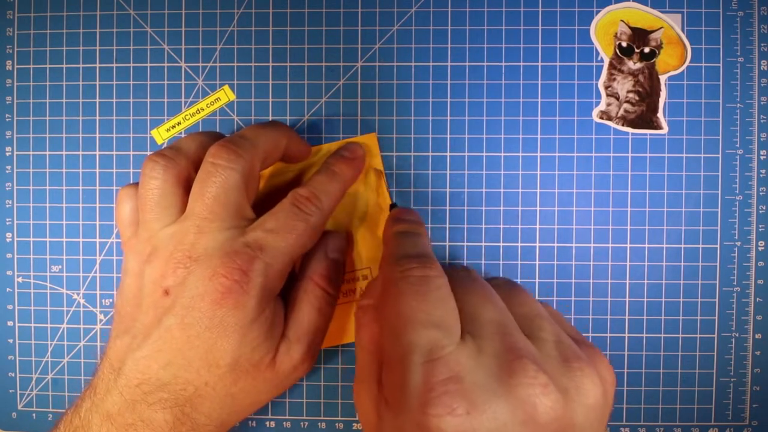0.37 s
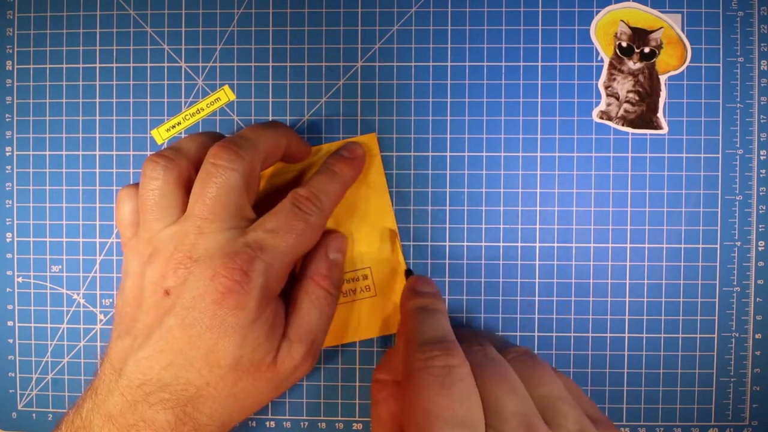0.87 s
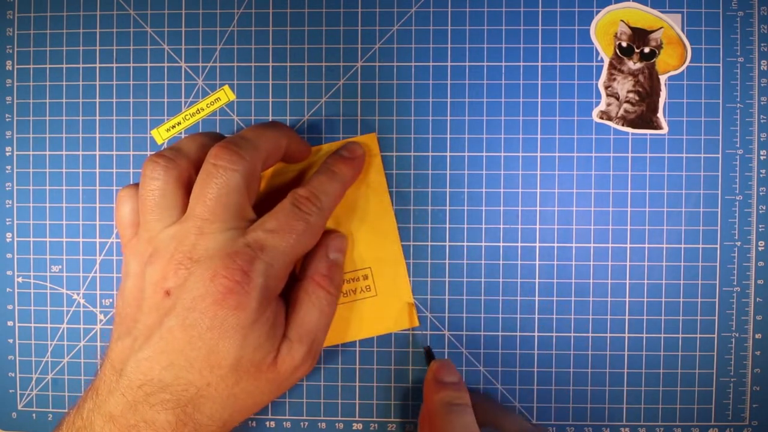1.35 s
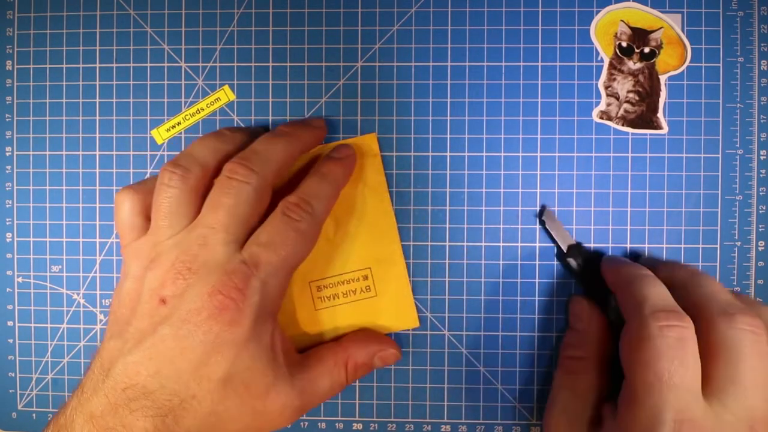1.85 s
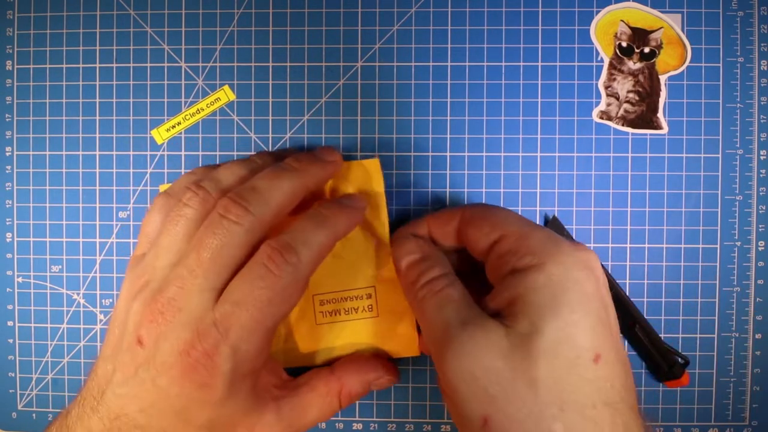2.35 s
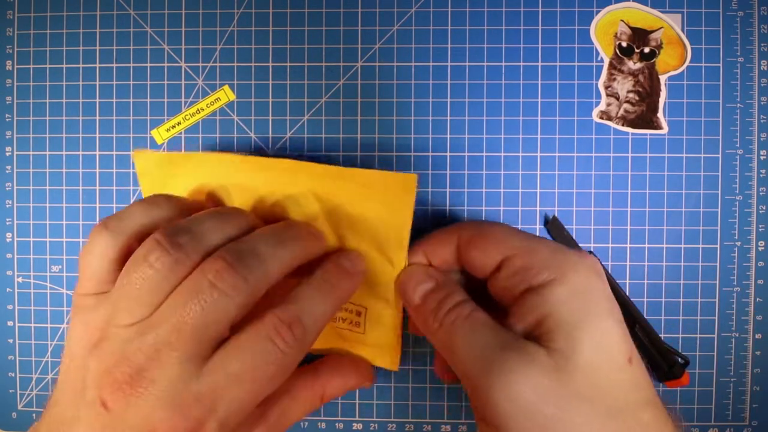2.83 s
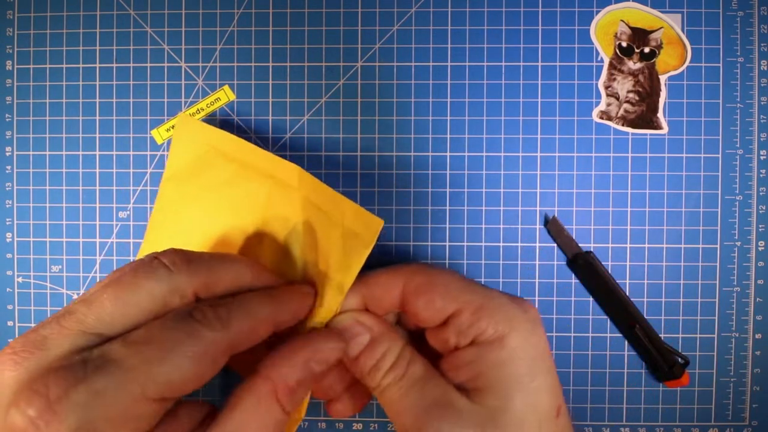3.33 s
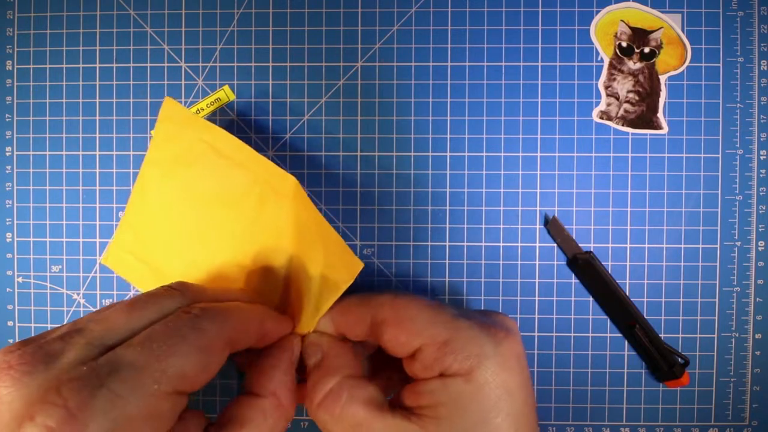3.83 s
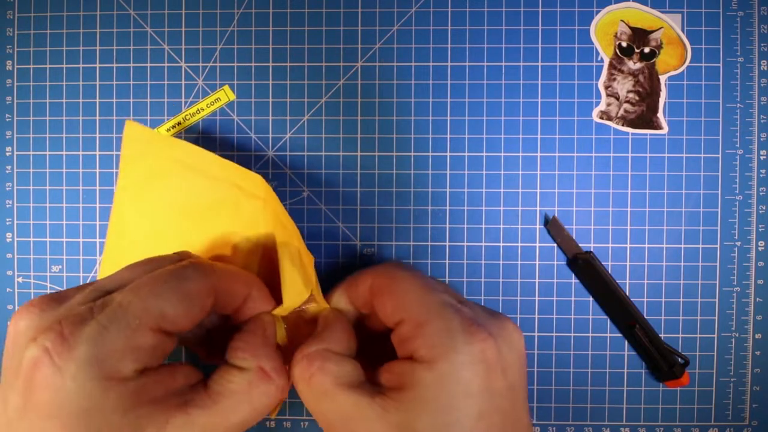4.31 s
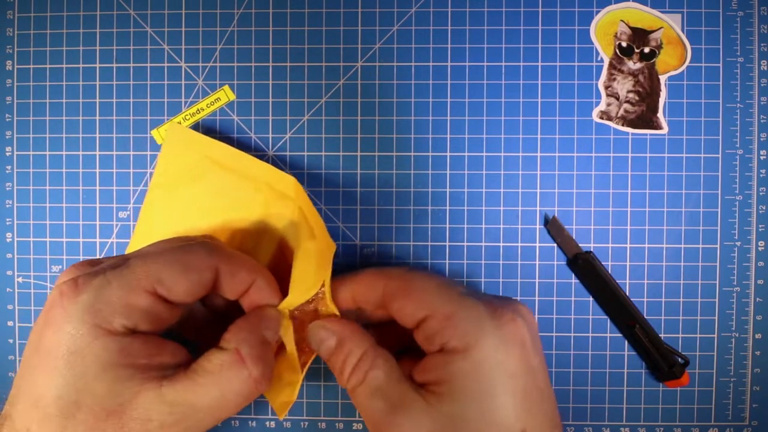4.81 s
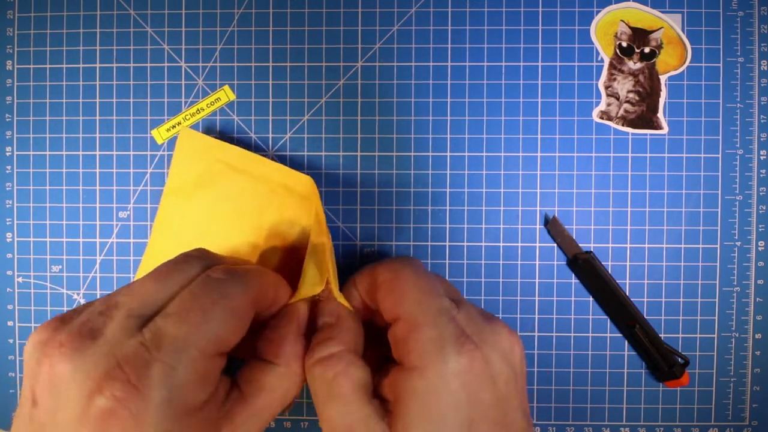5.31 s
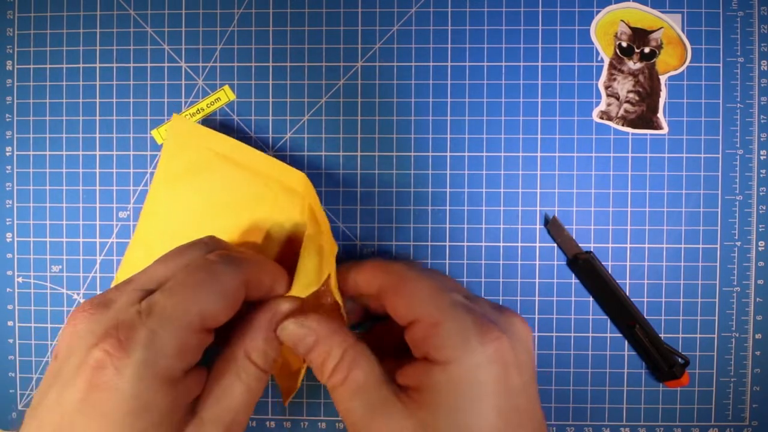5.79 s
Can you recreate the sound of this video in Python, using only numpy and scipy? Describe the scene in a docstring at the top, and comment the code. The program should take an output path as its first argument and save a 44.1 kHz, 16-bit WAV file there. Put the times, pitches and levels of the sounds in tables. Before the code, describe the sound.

Close, nearly mono desk sound in a small room, over faint hiss, low hum and soft table rumble. It starts almost silent; from about 0.2 s a blade scratches through the edge of a paper envelope, a thin, gritty hiss with fine bright ticks, clearest at 0.55 s and until 1.3 s, fading by 1.5 s. Light handling knocks follow, then at 1.91 s the cutter lands with a hard, bright clack, a second knock at 1.97 s and a short loose rattle dying by about 2.2 s. From 2.3 s hands rub and bend the padded paper: mid-toned rustle in uneven surges, crisp snaps at 2.35, 2.7 and 3.14 s, and a dull bump near 3.0 s. It is sparser around 3.5 to 4.1 s, then crackling thickens from 4.2 s with faint soft flexes. The strongest cracks come at 5.5, 5.6, 5.7 and 6.1 s, with the rustle still rising as it ends.

```python
"""A small blade slits the edge of a padded paper envelope on a cutting mat, ticking as it cuts; the knife is
dropped with a rattle, then two hands pull the envelope open, creases snapping over a fine rustle. Sharp cracks
are short noise bursts in bands, the knife a set of struck resonators, the rustle noise driven by clumped tiny
cracks. Padding flexes in soft decaying tones and a small room answers with dense echoes; a close, nearly mono
microphone adds desk rumble, mains hum and faint hiss."""
import sys
import numpy as np
from scipy import signal
from scipy.fft import rfft, irfft
from scipy.io import wavfile

SR = 44100
rng = np.random.default_rng(int(sys.argv[2]) if len(sys.argv) > 2 else 0)


def gain_from_db(level_db):
    """Turn a decibel level (scalar or array-like) into a linear amplitude factor."""
    decades = np.asarray(level_db, float) / 20
    return 10 ** decades


def persist_wave(psi):
    """Save psi, clipped to +-1, as 16-bit WAV."""
    counts = np.round(np.clip(psi, -1, 1) * 32767).astype(np.int16)
    wavfile.write(sys.argv[1], SR, np.atleast_2d(counts).T)


N = 271656

# Sharp cracks: up to 1.3 s ticks of the blade cutting paper, from 1.57 to 2.14 s the knife striking the mat,
# then creases snapping. Each row: start in seconds, relative level in dB, centre in Hz,
# fall below and fall above the centre in dB per octave (sign ignored).
CRACKS = [(.449,-28,4500,14,-2),(.556,-10,4200,20,19),(.602,-23,4000,15,6),(.752,-34,4300,7,6),(.776,-26,4300,9,9),(.822,-23,4200,6,7),(.873,-21,4200,14,7),(.945,-22.5,4000,7,6.5),(1.041,-21.5,4200,11,8),(1.206,-21,2900,18,4.5),(1.224,-21,2500,4,4),(1.257,-17.5,3800,11,11),(1.299,-26.5,4200,3.5,2.5),
          (1.574,-26.5,4000,5.5,5),(1.609,-27.5,2290,6.5,2.5),(1.788,-26.5,1410,8,5),(1.805,-31,2200,1,0.5),(1.85,-25.5,1400,6,5),(1.858,-29,1500,2,10),(1.906,-20,2500,0,6),(1.916,-17,5000,6.5,4),(1.91,2.5,2660,9.5,13),(1.968,-5,2680,6.5,12),(2.064,-12,2500,12,9.5),(2.136,-30,1000,3,6),
          (2.28,-19,680,2,5.5),(2.338,-26,2200,3,14),(2.373,-35,8000,4,1),(2.348,-9.5,3600,10,17),(2.362,-21,800,10,13),(2.395,-22.5,1600,3,10),(2.476,-25,2380,2,6),(2.506,-22,1200,0,3.5),(2.532,-21.5,3600,17,14),(2.663,-33,1400,-1,4),(2.694,-10.5,3000,11,11.5),(2.735,-30,500,4,10),(2.805,-12.5,1500,15,14),(2.824,-19.5,500,4,5),(2.847,-21,4000,10,9),(2.882,-23.5,1000,20,2),(2.942,-24.5,950,8,5),(2.967,-36,350,4,5),(3.002,-29,1810,1,7),(3.106,-22,2000,3.5,4),(3.132,-18.5,1080,11,3),(3.143,-8,3780,6,9.5),(3.294,-27.5,900,5,13),(3.325,-28,7000,20,-4),(3.405,-29,800,5,4),(3.49,-17.5,2200,10,10.5),(3.755,-22.5,1740,10,18),(3.835,-31,1500,10,4),(3.849,-22,1900,17,9),(3.888,-18,1870,13,6),(3.937,-18.5,1600,9.5,9),
          (4.166,-24.5,4500,10,6),(4.198,-28,8000,15,1),(4.235,-12.5,1780,10.5,10),(4.215,-31,6000,14,0),(4.255,-21.5,4500,10,2),(4.264,-15.5,3000,4,5),(4.288,-21,2600,9,1),(4.365,-11,5000,5,-3.5),(4.374,-23,1600,7,9),(4.421,-22.5,4800,9,1.5),(4.585,-17,2200,8.5,5.5),(4.595,-27,1000,12,3),(4.694,-26,1200,0,3),(4.715,-19.5,1200,-2,4),(4.727,-19.5,1890,9,8),(4.866,-29,1800,3,5.5),(4.901,-28,2400,5,5.5),(4.941,-14,2360,3,5),(4.947,-17,4000,9,14),(5.008,-29,2500,8,14),(5.082,-19.5,890,16,12),(5.113,-24.5,900,5,2),(5.143,-22.5,3800,4,2),(5.246,-28,2800,7,2),(5.288,-26.5,2600,10,3.5),(5.385,-22.5,1900,16,5),(5.401,-24,3600,6,4),
          (5.478,-6.5,1155,19.5,12),(5.487,-20,3200,4,3),(5.518,-25.5,2300,13,0.5),(5.589,-3,2330,8.5,8),(5.597,-25,2100,24,21),(5.677,-21,2120,10,6),(5.719,-1,2530,16,10),(5.748,-11,2100,16,16),(5.762,-18.5,816,10,14),(5.81,-23.5,1300,6,5),(5.837,-20,1000,12,6),(5.912,-21.5,900,8,12),(6.006,-24,2000,12,5.5),(6.042,-22.5,3600,-4.5,0),(6.092,-16.5,1200,6,11),(6.096,1,1420,11,8),(6.15,-18,2600,15,4)]
# Bands of a crack. Each row: low edge in Hz, high edge in Hz, decay constant in seconds.
CRACK_BANDS = [(201, 730, 0.0023), (590, 1350, 0.0017), (1435, 2560, 0.0021), (3000, 5200, 0.0018),
               (6140, 28000, .0014)]
# Resonances of the envelope. Each row: frequency in Hz, width in Hz, gain in dB.
PAPER_MODES = [(922, 380, 12.5), (1812, 124, 8.5), (2262, 470, 7), (3600, 1000, 12), (4200, 790, 11.5)]
# Knife body and loose blade knocking. Each row: start in seconds, relative level in dB.
KNOCKS = [(1.576, -44), (1.61, -35), (1.807, -32), (1.851, -19), (1.9064, -22), (1.9117, -4), (1.969, -5.5)]
# Modes of the knife. Each row: frequency in Hz, relative level in dB, t60 in seconds (limited when used).
KNIFE_MODES = [(2960, 3, 0.018), (5750, -7.5, 0.051), (5800, -11, 0.059), (6800, 0.5, 0.018),
               (7540, -3.5, 0.021), (8500, -8, 0.022), (9460, -5, 0.08), (10700, -19, .03),
               (12360, -15, .03), (14000, -4, 0.017), (15000, -3, 0.02)]
# Loose blade rattling on. Each row: frequency in Hz, relative density in dB per Hz.
RATTLE_COLOUR = [(180, -47), (300, -17), (348, -3), (814, -17), (2250, -2.5), (2440, -13), (6100, -7),
                 (10000, -20), (16000, -15.5)]
# The padded sheet flexing softly. Each row: start in seconds, relative level in dB, pitch in Hz.
FLEXES = [(2.755, -32, 353), (4.528, -37, 306), (4.546, -39.5, 345), (4.607, -35, 372), (4.663, -34.5, 278),
          (4.797, -33.5, 283), (4.972, -36, 360)]
# Blade slicing the edge. Each row: time in seconds, level in dB, tilt in dB per octave.
CUT = [(0.0, -78, -9), (0.22, -48, -1), (0.46, -40, 0.3), (0.66, -40, 0.1), (1.12, -39.5, -0.6),
       (1.276, -39.5, 1), (1.416, -43, -0.3), (1.56, -63, -3)]
# Hands rubbing and pulling the paper. Each row: time in seconds, level in dB, tilt in dB per octave.
HANDS = [(1.57,-68,-4),(1.7,-51,4.5),(1.79,-46,-1.5),(1.87,-38,-0.5),(2.04,-47,1),(2.13,-41,-1.5),(2.22,-44,-1),(2.3,-43.5,-4),(2.38,-37.5,2.5),(2.465,-37.5,0.5),(2.56,-62,-6),(2.64,-42.5,-1),(2.8,-52,1),(2.89,-36.5,1.5),(2.97,-41.5,-1),(3.12,-36.5,1),(3.23,-46,-1),(3.4,-43.5,1.5),(3.49,-46,-1.5),(3.65,-46,1),(3.74,-48,-2.5),(3.83,-39,-0.5),(3.91,-41.5,-1),(4.0,-51,0),(4.12,-49.5,2),(4.25,-37.5,3),(4.42,-38.5,-1),(4.52,-48,3.5),(4.76,-40,-3),(4.86,-52.5,2),(5.0,-40,-2.5),(5.1,-37,0.5),(5.19,-44.5,2),(5.27,-36.5,0.5),(5.355,-43,2.5),(5.44,-35,1.5),(5.6,-44.5,1.5),(5.7,-35.5,0),(5.79,-50.5,-1),(5.9,-38,0),(6.03,-39.5,1.5),(6.16,-31,0)]
# Blade through paper. Each row: frequency in Hz, relative density in dB per Hz.
BLADE_COLOUR = [(150, -34), (250, -8), (475, -10), (917, -10.5), (999, -10.5), (1960, 4.5), (2140, 1.5),
                (2880, 1), (4280, 0.5), (6060, 1.5), (11100, -14.5), (12800, -9.5), (15700, -12)]
# Hands on paper. Each row: frequency in Hz, relative density in dB per Hz.
HANDS_COLOUR = [(150, -37), (250, -37), (372, 0.5), (466, -11.5), (917, -4.5), (1440, 3), (1800, 8),
                (2380, -2), (2880, 3.5), (4280, 2.5), (6490, -3), (15700, -23)]
# Bands of the rustle. Each row: low edge in Hz, high edge in Hz, blade gain in dB, hands gain in dB.
RUSTLE_BANDS = [(290, 1220, -9.5, -7), (1400, 2870, -5.5, -1), (3000, 5790, -3, -2.5),
                (6000, 28000, -7, -10)]
# Echo bands of the room. Each row: low edge in Hz, high edge in Hz, t60 in seconds, relative level in dB.
ROOM = [(197, 2400, 0.36, -19.5), (1110, 3830, 0.29, -15), (2770, 10600, 0.47, -19),
        (5500, 12800, 0.26, -13.5)]
# Hands leaning on the desk. Each row: time in seconds, level in dB.
DESK = [(0.0, -56.5), (0.62, -49), (1.63, -55), (2.07, -50), (3.14, -52), (3.43, -58), (4.22, -63),
        (4.62, -53), (5.04, -56.5), (6.16, -55.5)]
# Rumble of the desk. Each row: frequency in Hz, relative density in dB per Hz.
DESK_COLOUR = [(20, -15), (60, -9), (120, -1), (165, -3.5), (205, 2), (250, -6), (330, -8), (500, -18),
               (900, -63)]
# Desk bumped by knife or wrist. Each row: centre in seconds, added level in dB.
BUMPS = [(1.82, -43.5), (1.92, -38.5), (2.02, -44), (2.141, -40), (2.25, -49), (3.0, -39.5), (3.82, -50),
         (4.29, -52), (4.58, -54), (6.09, -54)]
# Mains hum. Each row: frequency in Hz, rms level in dB.
HUM = [(50, -71.5), (100, -78)]
# Microphone hiss. Each row: frequency in Hz, relative density in dB per Hz.
HISS_COLOUR = [(12, -57), (20, -17), (34, -6.5), (154, -5), (255, -11), (399, -45), (434, -33), (472, -10),
               (16000, -26.5)]
# Hiss of opposite sign in the two channels. Each row: frequency in Hz, relative density in dB per Hz.
SPREAD_COLOUR = [(20, 6), (150, 4.5), (1000, -2), (15700, 0.5), (16000, -40)]

BLADE_OUT_S = 1.53   # the blade gives way to the hands
CUTOFF_HZ = 15750    # top of the recorded spectrum


def rms_one(x):
    """Normalisation to unit rms."""
    return x / np.sqrt(np.mean(x ** 2) + 1e-20)


def in_time(rows):
    """Linear interpolation of each column over all samples."""
    s, *columns = np.transpose(rows)
    return [np.interp(np.arange(N) / SR, s, c) for c in columns]


def band(x, low_hz, high_hz):
    """Causal band-pass filtering."""
    edges = [low_hz, min(high_hz, SR / 2.2)]
    return signal.sosfilt(signal.butter(2, edges, "band", fs=SR, output="sos"), x)


def coloured(x, spectrum):
    """Spectral shaping of a steady sound, with unit rms."""
    hz, db = np.transpose(spectrum)
    grid = np.maximum(np.fft.rfftfreq(len(x), 1 / SR), 1)
    gain = gain_from_db(np.interp(np.log(grid), np.log(hz), db))
    return rms_one(irfft(rfft(x) * gain, len(x)))


def drift(rate_hz):
    """Slow random fluctuation of unit rms: noise through a two-pole low-pass."""
    r = np.exp(-2 * np.pi * rate_hz / SR)
    noise = rng.standard_normal(N + SR)
    return rms_one(signal.lfilter([1], [1, -2 * r, r * r], noise)[SR:])   # first second settles the filter


def cracks():
    """Stick-slip: each crack is a few slips within milliseconds, lows ringing longest, peaking at its own pitch."""
    rows, size = np.vstack([CRACKS, ticks(count=160)]), 1024
    t, out = np.arange(size) / SR, np.zeros(N + size)
    spikes = rng.standard_normal((len(rows), size)) ** 3
    slips = signal.lfilter([1], [1, -0.6], spikes)   # duller towards the top
    times, level_db, centre, below, above = rows.T
    for low_hz, high_hz, decay in CRACK_BANDS:
        shape = (t / decay) ** 1.26 * np.exp(-t / decay * 1.144)
        bursts = band(paper(slips * shape), low_hz, high_hz)
        bursts = band(bursts, low_hz * 0.84, high_hz * 1.225)
        energy = np.sum(bursts ** 2, axis=1, keepdims=True)
        bursts /= np.sqrt(energy / (decay * SR))   # height 1 over one decay time
        # octaves by which the band lies below or above the crack's centre
        under = np.maximum(np.log2(centre / high_hz) + 0.43, 0)
        over = np.maximum(np.log2(low_hz / centre) + 0.61, 0)
        band_db = level_db - np.abs(below) * under - np.abs(above) * over
        for burst, s, db in zip(bursts, times, band_db):
            at = round(s * SR)
            out[at:at + size] += gain_from_db(db - 5.5) * burst
    return out[:N]


def ticks(count):
    """Random small cracks, louder under stronger rubbing, denser and higher under the blade; rows as in CRACKS."""
    over_rub_db, spread_db, fall_db_per_oct = 6, 4, 6
    blade_hz, hand_hz = 4500, 2000
    blade_scatter_oct, hand_scatter_oct = 0.5, 0.85
    blade_share = 0.4   # part of the cracks that falls under the blade
    cutting, level_db, _ = rubbing_levels()
    when, size, pitch = rng.random((count, 3)).T
    at = np.interp(when, [0, blade_share, 1], [0, BLADE_OUT_S * SR, N - 1]).astype(int)
    db = level_db[at] + over_rub_db - spread_db * np.log(np.maximum(size, 0.1))
    scatter = np.where(cutting[at], blade_scatter_oct, hand_scatter_oct)
    hz = np.where(cutting[at], blade_hz, hand_hz) * 2 ** (scatter * (2 * pitch - 1))
    fall = np.full(count, fall_db_per_oct)
    return np.transpose([at / SR, db, hz, fall, fall])


def paper(x):
    """Parallel resonance: the envelope's modes add to the plain sound."""
    out = x
    for hz, width_hz, db in PAPER_MODES:
        r = np.exp(-np.pi * width_hz / SR)
        poles = [1, -2 * r * np.cos(2 * np.pi * hz / SR), r * r]
        out = out + gain_from_db(db) * signal.lfilter([(1 - r * r) / 2, 0, (r * r - 1) / 2], poles, x)
    return out


def knife():
    """Modal excitation: each knock sets the loose blade chattering, broad and bright, into the knife's modes."""
    rows, out = np.array(KNOCKS), np.zeros(N)
    at = np.round(rows[:, 0] * SR).astype(int)
    size = 2000
    chatter = np.exp(-np.arange(size) / SR / 0.01)
    for hz, db, t60 in KNIFE_MODES + [(8800, 16, 0.00088)]:   # the last, very wide ring is the bare clatter
        clicks = np.full(N + size, 1e-18)
        gains = gain_from_db(rows[:, 1] + db - 35.0 + rng.normal(0, 1.7, len(at)))
        for i, gain in zip(at, gains):
            clicks[i:i + size] += gain * chatter * rng.standard_normal(size)
        r = gain_from_db(-60 / (np.clip(t60, 1 / 4000, 1 / 25) * SR))   # rings last at most 40 ms
        w = 2 * np.pi * hz / SR
        out += signal.lfilter([0, np.sin(w)], [1, -2 * r * np.cos(w), r * r], clicks[:N])
    return out


def rattle():
    """Dense impacts heard as noise: the blade chatters in its sleeve, held through the bounce and then dying."""
    start_s, level_db, hold_s, t60_s = 1.915, -24.5, 0.071, 0.29
    t = np.arange(N) / SR - start_s
    fade_db = level_db - 60 * np.maximum(t - hold_s, 0) / t60_s
    fade = gain_from_db(fade_db + 1.8 * drift(80))
    return (t > 0) * fade * coloured(rng.standard_normal(N), RATTLE_COLOUR)


def rustle(per_s, spread_db, clump_db, smooth_db):
    """Friction noise: clumped tiny cracks of uneven size over a smooth rub, level and tilt following the rubbing."""
    tilt_pivot_hz = 2500
    born = rng.random(N) < per_s * gain_from_db(clump_db * drift(30)) / SR
    sizes = gain_from_db(spread_db * np.minimum(rng.exponential(1, N), 3.0)) * born
    crack_power = signal.lfilter([1], [1, -np.exp(-1 / (0.0015 * SR))], sizes ** 2)   # 1.5 ms decay
    power = crack_power / crack_power.mean() + gain_from_db(2 * smooth_db)
    source = np.sqrt(power) * rng.standard_normal(N)
    cutting, level_db, tilt = rubbing_levels()
    sliced, rubbed = coloured(source, BLADE_COLOUR), coloured(source, HANDS_COLOUR)
    out = 0
    for low_hz, high_hz, blade_db, hands_db in RUSTLE_BANDS:
        blade = gain_from_db(blade_db) * rms_one(band(sliced, low_hz, high_hz))
        hands = gain_from_db(hands_db) * rms_one(band(rubbed, low_hz, high_hz))
        middle_hz = np.sqrt(low_hz * min(high_hz, CUTOFF_HZ))
        octaves = np.log2(middle_hz / tilt_pivot_hz)
        gain = gain_from_db(level_db + tilt * octaves + 1.3 * drift(20))   # each band wavers by itself
        out = out + gain * np.where(cutting, blade, hands)
    return out


def rubbing_levels():
    """Friction in time: level and tilt of whatever rubs the paper, first the blade, then the hands."""
    cutting = np.arange(N) < BLADE_OUT_S * SR
    level_db, tilt = np.where(cutting, in_time(CUT), in_time(HANDS))
    return cutting, level_db, tilt


def flexes():
    """Damped bending: each flex is a few soft cycles that swell and fade."""
    t, out = np.arange(2000) / SR, np.zeros(N)
    swell = t / 0.0042 * np.exp(1 - t / 0.0033)
    for s, db, hz in FLEXES:
        at = round(s * SR)
        out[at:at + len(t)] += gain_from_db(db) * swell * np.sin(2 * np.pi * hz * t)
    return out


def room(x):
    """Reverberation: dense echoes start after the first wall and die band by band."""
    t = np.arange(SR // 2) / SR
    rise = np.clip((t - 0.003) / 0.0051, 0, 1)
    echoes = 0
    for low_hz, high_hz, t60, db in ROOM:
        echoes = echoes + gain_from_db(db - 60 * t / t60) * band(rng.standard_normal(len(t)), low_hz, high_hz)
    return signal.fftconvolve(x, gain_from_db(-20.5) * rise * echoes)[:N]


def desk():
    """Structure-borne sound: low lumpy rumble carried by the table, swelling briefly at each bump."""
    t, bump_s = np.arange(N) / SR, 0.018
    bumps = sum(gain_from_db(db) * np.exp(-((t - s) / bump_s) ** 2) for s, db in BUMPS)
    leaning = gain_from_db(in_time(DESK)[0] + 2.2 * drift(10))
    return (leaning + bumps) * coloured(rng.standard_normal(N), DESK_COLOUR)


def background():
    """Stationary noise floor: microphone hiss as shaped noise and mains hum as sines."""
    t = np.arange(N) / SR
    hum = sum(gain_from_db(db) * np.sqrt(2) * np.sin(2 * np.pi * hz * t) for hz, db in HUM)
    return hum + gain_from_db(-54.5) * coloured(rng.standard_normal(N), HISS_COLOUR)


def scene():
    """Superposition: every source sits in the middle; only a faint hiss differs between the channels."""
    hits = cracks() + knife() + flexes()
    rubbing = rustle(per_s=300, spread_db=6.0, clump_db=6.5, smooth_db=3)
    middle = hits + room(hits + rubbing) + rubbing + rattle() + desk() + background()
    side = gain_from_db(-67) * coloured(rng.standard_normal(N), SPREAD_COLOUR)
    return np.array([middle + side, middle - side])


def top_cut(x):
    """Nothing passes above the cut-off."""
    return signal.sosfilt(signal.butter(12, 16630, fs=SR, output="sos"), x)


def record(dry):
    """Band-limiting and clipping: the top is cut steeply and peaks are held within full scale."""
    low_pass = signal.ellip(10, 0.5, 50, CUTOFF_HZ, fs=SR, output="sos")   # ripple 0.5 dB, stop band -50 dB
    mix = np.clip(signal.sosfilt(low_pass, dry), -1, 1)
    return top_cut(mix)


dry = scene()
out = record(dry)
persist_wave(out)
```